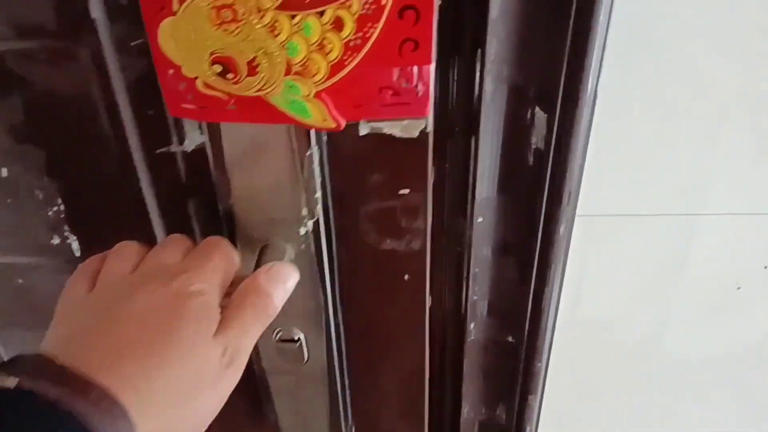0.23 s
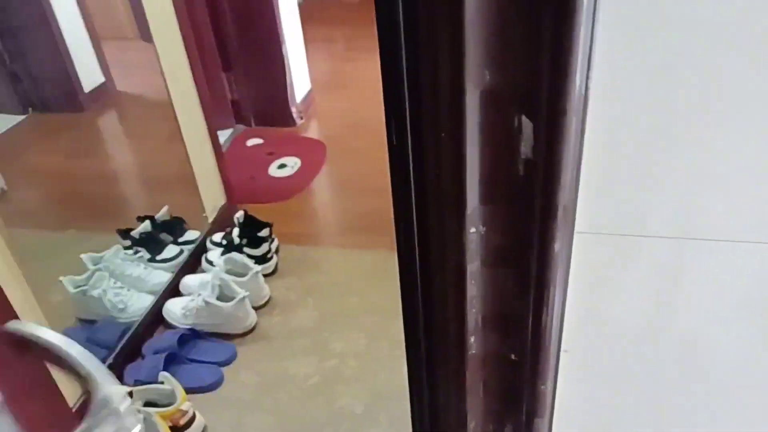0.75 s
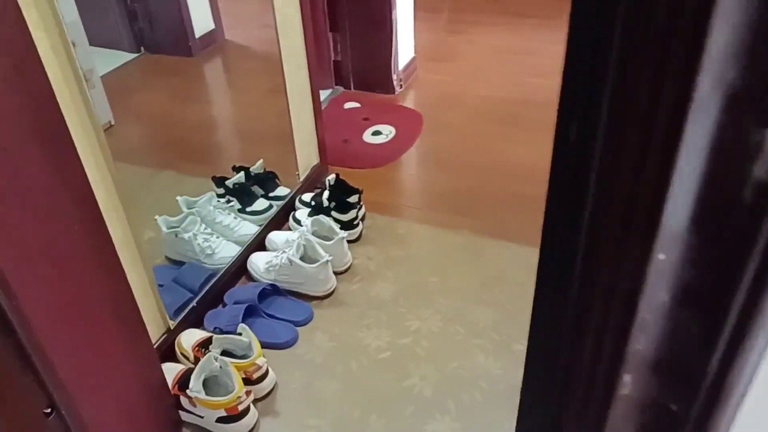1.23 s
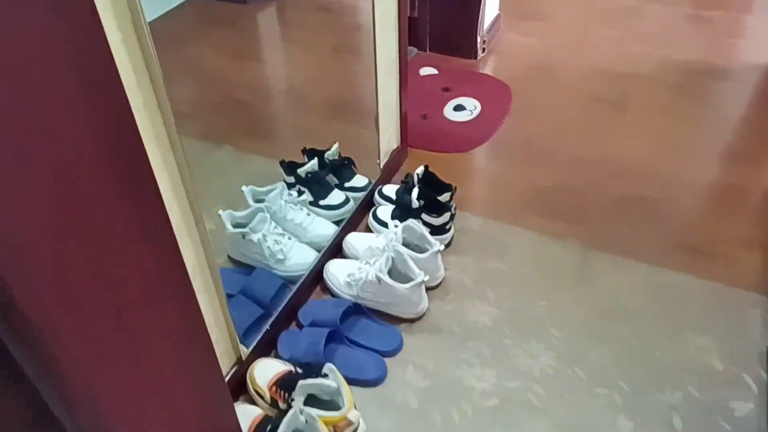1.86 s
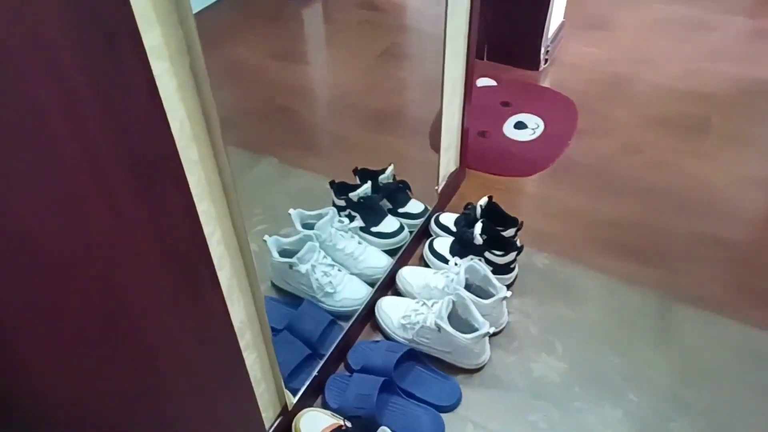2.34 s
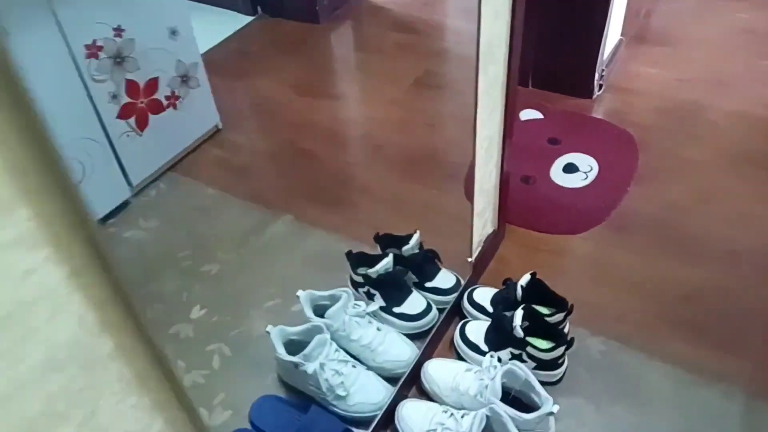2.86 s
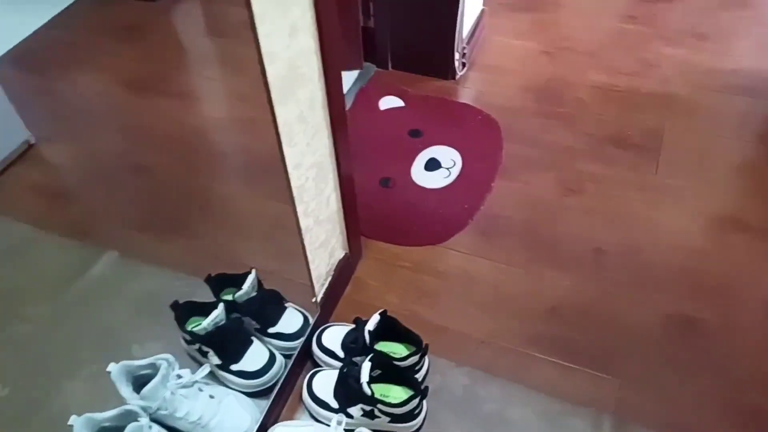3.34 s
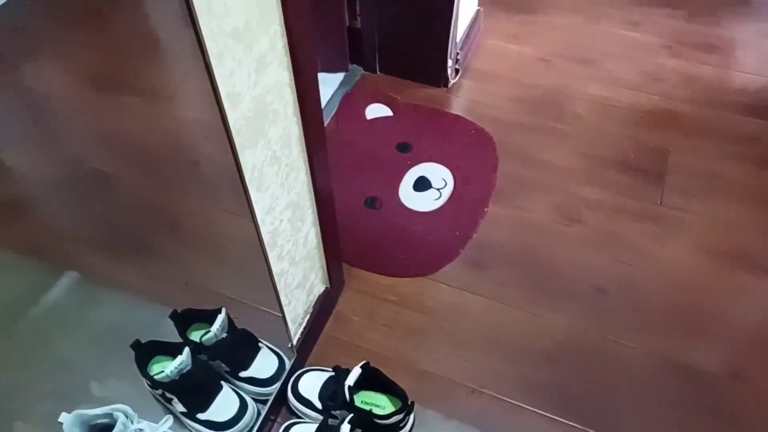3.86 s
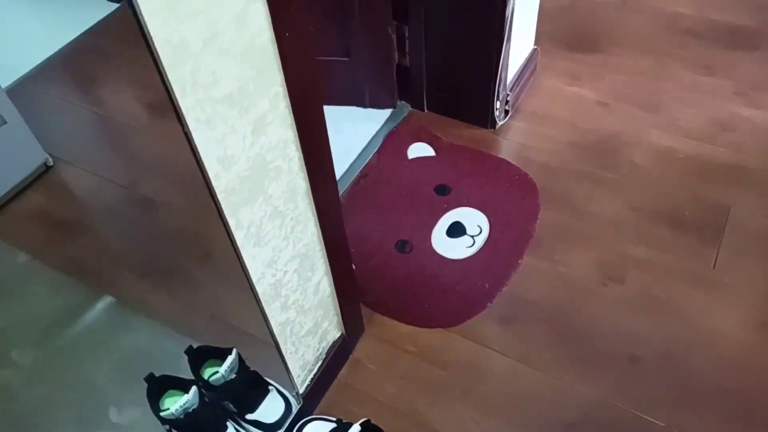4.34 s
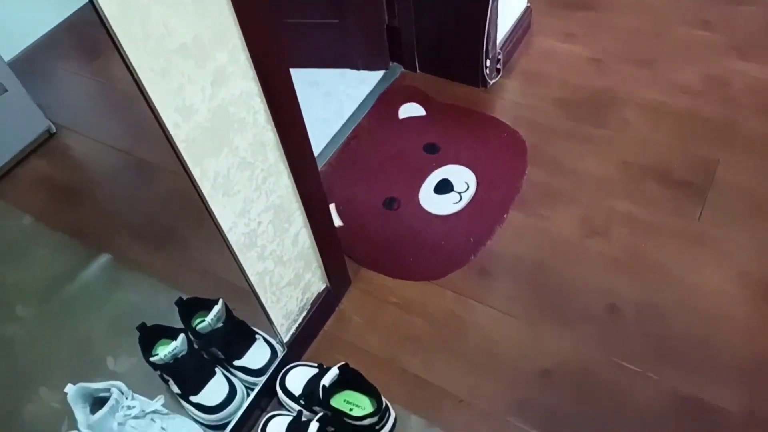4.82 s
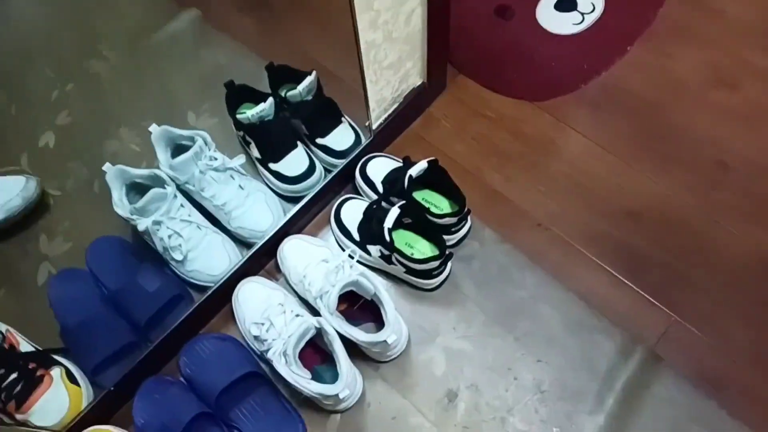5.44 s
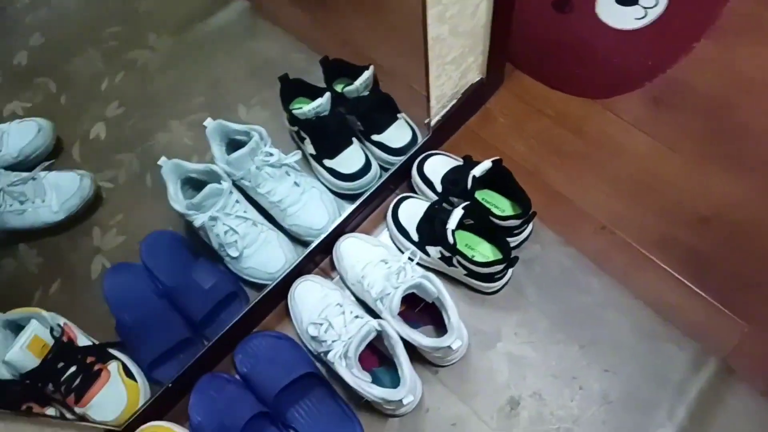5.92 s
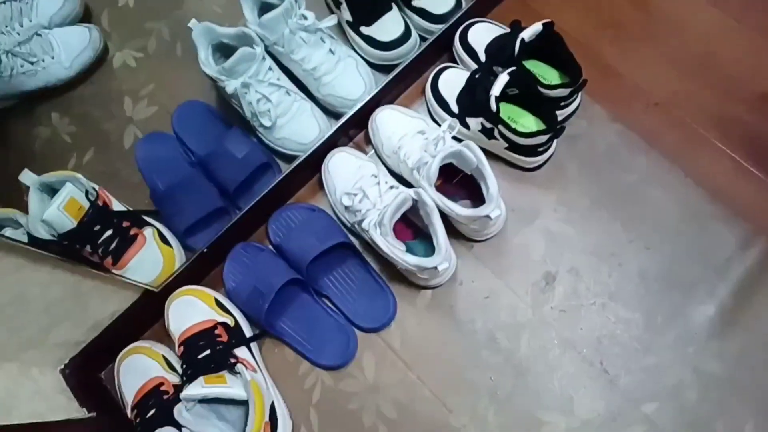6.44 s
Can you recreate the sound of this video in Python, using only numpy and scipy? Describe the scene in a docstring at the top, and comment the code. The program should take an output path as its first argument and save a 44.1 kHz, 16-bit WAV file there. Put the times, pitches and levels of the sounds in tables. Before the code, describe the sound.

A steel front door is heard close up in a hard entrance hall, over wavering airy microphone hiss and faint low murmur. At about 0.1 s the handle gives a small crisp latch click with a little rubbing, then a soft dull knock of the leaf at 0.3 s and a tiny tick at 0.4. Quiet, low footfalls thump from about 1.1 to 1.8 s. Muffled bumps come at 2.5-2.9 s, with a bright double click at 2.94 and a hard, sharp clack at 3.26. Light knocks follow at 3.6 and 3.8. At 4.03 s the door slams: a very loud, deep double thud, the second blow 0.05 s later with bright metallic crash, short boom and echo. Loose lock metal rattles at 4.4 s and ticks at 4.7. Afterwards hiss, very faint foot shifts from 5.1, a slight scrape and click near 6.2, and a soft bump at 6.64.

```python
"""A steel front door is unlatched, swung open and, after a few steps indoors, pulled shut with a double thud.
Leaf and latch case ring with their own modes at each blow; rubbing parts and a loose lock part
are driven by clumps of random contacts; feet set the floor thumping on decaying sines.
A hard entrance hall answers with dying noise tails and booms after the slam.
Behind it lie the wavering hiss of two small microphones and the low murmur and rumble of the hall."""
import sys
import numpy as np
from scipy import signal
from scipy.fft import rfft, irfft, next_fast_len
from scipy.io import wavfile
from scipy.ndimage import uniform_filter1d

SR = 44100
rng = np.random.default_rng(int(sys.argv[2]) if len(sys.argv) > 2 else 0)


def wrap_up_sound(samples):
    """Save the sound to the file named by the first command line argument, as 16-bit audio."""
    columns = np.atleast_2d(samples).T
    # keep every value between -1 and 1, then stretch to whole-number steps
    tamed = np.clip(columns, -1, 1)
    steps = np.round(tamed * 32767).astype(np.int16)
    wavfile.write(sys.argv[1], SR, steps)


def linear_from_db(decibels):
    """Turn decibels (scalar or array-like) into linear amplitude factors; 0 gives 1."""
    return 10 ** (np.asarray(decibels, float) / 20)


N = 294588   # length in samples

# All levels are relative: each layer's own trim and the stereo balance come on top.
# Blows on the door leaf: start_s, level_db, middle_hz and width_octaves of the excited range,
# freedom to ring (share of the full t60, 0-1)
LEAF_BLOWS = [(0.079, -41, 263, 0.38, 0.7), (.307, -26, 232, 0.79, 0.54), (2.475, -29, 277, 0.29, 0.14),
              (2.580, -40, 560, 0.83, 0.47), (2.602, -34, 346, 0.76, 0.13), (2.658, -16.5, 310, 0.99, 0.06),
              (2.679, -31.5, 252, 0.67, 0.35), (2.701, -34, 297, 1, 0.11), (2.755, -36.5, 400, 1.6, 0.37),
              (2.829, -34, 303, 0.6, .2), (2.857, -40, 119, 0.63, 0.7), (2.916, -32, 48.2, 0.23, 1),
              (2.926, -24, 170, 0.85, 0.28), (2.940, -24.5, 450, 0.25, 0.96),
              (3.259, -26.5, 293, 1.1, 0.58), (3.638, -26.5, 314, 0.89, 0.44), (3.843, -45, 219, 2, 0.44),
              (4.031, 1.5, 176, 0.45, 0.39), (4.083, -2.5, 71, 0.81, 0.46), (4.086, -6, 169, 1.19, 0.49),
              (4.103, -14, 278, 0.78, 0.7), (4.117, -10, 200, 1, 0.39), (4.190, -20, 200, 0.65, 0.97),
              (4.24, -22.5, 155, .3, 0.99), (6.637, -34, 110, 0.77, 0.5), (6.643, -30, 370, 0.76, 0.25)]
# Main modes of door leaf and frame: pitch_hz, level_db, t60_s when fully free
LEAF_MODES = [(43.6, -2.5, 1.05), (48.9, -12.5, 2.7), (73.7, -4, 0.96), (97, -2, 0.21), (121.3, -2, 0.17),
              (157.4, -8.5, 1.89), (162, -7.5, 0.61), (183.4, -14, 0.56), (222.1, -3, 0.59),
              (268, -17, 0.16), (308, -7, 0.75), (324, -6.5, 0.24), (395, -4.5, 0.52), (476, 0.5, 0.18),
              (535, -14.5, 0.77), (686, -1.5, 0.25)]
# Latch clicks: start_s, level_db, middle_hz and width_octaves of the excited range
LATCH_CLICKS = [(0.032, -31, 1300, .5), (0.086, -33, 1300, 0.5), (0.096, -8.5, 1440, 0.26),
                (0.105, -34, 1300, 0.45), (0.108, -40, 1300, .6), (0.397, -30, 2840, 0.37),
                (2.911, -30, 1250, 0.55), (2.9429, -13, 2580, 0.74), (2.946, -11.5, 2350, 0.29),
                (3.2587, -1, 1660, 1.6), (3.543, -31.5, 4060, 1.6), (3.845, -26.5, 1240, 1.25),
                (4.032, -15, 4500, 2), (4.035, -26, 2400, 2.1), (4.084, -1, 5500, 1.2),
                (4.087, -2.5, 2400, 0.97), (4.108, -9, 6300, .7), (4.121, -6.5, 2500, 1),
                (4.192, -11, 1800, 1.5), (4.414, -19, 3460, 0.97), (4.695, -24, 4500, 0.73),
                (6.185, -31, 2300, 1)]
# Modes of the latch case: pitch_hz, level_db, t60_s
LATCH_MODES = [(620, -16, .012), (800, -12, .012), (965, 0, .018), (1120, -4, .012), (1290, -3, .014),
               (1550, -9, .01), (1940, -8, .008), (2250, -5, .009), (2700, -10, .006), (3400, -9, .006),
               (4500, -4, .006), (6000, -6, .005), (7100, -8, .004), (11000, -7, .003)]
# Bouts of rubbing and chattering parts: start_s, t60_s, scrape_db, grit_db, ticks_db
CHATTER_BOUTS = [(0.03, .3, -50, -56, -75), (0.065, 0.27, -41, -38, -49.5), (0.13, 0.67, -50, -51.5, -80),
                 (2.905, 0.22, -34.5, -46, -44), (2.936, 0.055, -38, -37, -27.5),
                 (3.54, .12, -49, -50, -38), (4.027, 0.11, -15.5, -14, -19.5),
                 (4.082, 0.17, -20, -13.5, -17), (4.105, 0.12, -21, -30, -25),
                 (4.13, 0.35, -28, -27.5, -36), (4.182, 0.17, -37.5, -34, -40),
                 (4.413, 0.17, -42, -20, -28), (4.483, 0.18, -70, -29.5, -42), (4.68, 0.17, -53, -40, -49),
                 (6.16, 0.36, -43, -38, -41.5), (6.225, 0.063, -50, -44, -58)]
# Colour of the dull scrape: pitch_hz, density_db (per Hz)
SCRAPE_COLOUR = [(210, -33), (350, -2), (439, -0.5), (475, -2), (596, 0.5), (731, -5.5), (2000, -3.5),
                 (2600, -33), (4400, -120)]
# Colour of the bright chatter: pitch_hz, density_db (per Hz)
GRIT_COLOUR = [(1000, -32), (1700, -24), (1850, 4), (2750, 6.5), (3380, 2.5), (4500, -5.5), (5850, -54),
               (9900, -120)]
# Colour of the sharp ticks: pitch_hz, density_db (per Hz)
TICKS_COLOUR = [(2530, -25), (4300, -7), (5840, 4), (6530, 0.5), (6930, 3.5), (8450, -20), (13400, -5),
                (15500, -25)]
# Rattling of the loose lock part after the door is shut: start_s, t60_s, level_db
RATTLE_BOUTS = [(4.408, 0.21, -22.5), (4.5, 0.63, -46.5)]
# Modes of the loose lock part: pitch_hz, level_db, t60_s
LOCK_MODES = [(964, -14, .12), (1631, -12, .08), (1932, 0, .16), (2040, -3, .14), (2230, -6, .08),
              (2295, -4, .08), (2352, -2, .12), (2380, -4, .1), (2547, -2, .14), (2926, -8, .1),
              (3185, -7, .1), (3683, 0, .12), (3747, -5, .1), (3791, -3, .12), (4587, -11, .08),
              (4980, -9, .08), (5426, -12, .07), (5900, -9, .05), (6150, -9, .05), (7050, -13, .06)]
# Footfalls and shifts of weight: start_s, level_db, pitch_hz of the floor thump, t60_s
FOOTFALLS = [(0.698, -55, 320, 0.072), (0.914, -53, 337.4, 0.84), (1.059, -44.5, 122, 0.19),
             (1.254, -37, 90, 0.089), (1.363, -31, 101, 0.092), (1.43, -32, 80.7, 0.082),
             (1.457, -35, 91.5, 0.081), (1.647, -35, 92, 0.14), (1.688, -29.5, 92.6, 0.13),
             (1.727, -29, 94, 0.094), (5.079, -44, 104, 0.13), (5.159, -49, 124, 0.15),
             (5.509, -46.5, 143, 0.22), (5.609, -49.5, 116, 0.14), (5.736, -43.5, 160, 0.12),
             (5.87, -53, 102, 0.15), (5.896, -48, 310, 0.24), (5.924, -47, 194, 0.24),
             (6.215, -50, 176, 0.12), (6.234, -51.5, 525, 0.3), (6.538, -49, 360, 0.22)]
# Left-right balance of door, feet and echoes: pitch_hz, left_over_right_db
DOOR_BALANCE = [(60, 1), (130, 2.5), (290, 0.5), (640, 0.5), (1410, -5.5), (3100, -14.5), (6820, 3.5),
                (15000, 4)]
# Late decay of the hall: pitch_hz, t60_s
HALL_DECAY = [(60, 0.29), (250, 0.2), (1000, 0.62), (3000, 0.37), (8000, 0.13), (15000, .2)]
# Strength of the hall echoes: pitch_hz, level_db
HALL_STRENGTH = [(60, -20), (300, -12), (1000, 2), (4000, -10), (12000, 7)]
# Edges for the echo bands, half an octave apart: pitch_hz
BAND_EDGES = 22 * 2 ** np.arange(0, 9.6, .5)
# Booming of the hall after the slam: start_s, t60_s, murmur_db, rumble_db
HALL_BOOM = [(4.1, 0.38, -28, -23)]
# Swells of the hiss: time_s, hiss_db, top_db (top of the hiss)
HISS_SWELLS = [(0.0, -63.5, -75), (0.15, -54.5, -80), (0.3, -63.5, -75), (0.61, -56.5, -64.5),
               (0.8, -53.5, -56.5), (1.08, -50.5, -53.5), (1.7, -51.5, -51), (2.31, -48, -49.5),
               (2.7, -50.5, -48), (3.0, -45, -45), (3.27, -47.5, -46), (3.7, -42.5, -45.5), (4.1, -47, -46),
               (4.28, -49, -47.5), (4.45, -43.5, -53), (4.7, -46, -48.5), (5.3, -46, -51),
               (6.0, -47.5, -51), (6.68, -47, -52.5)]
# Colour of the main hiss: pitch_hz, density_db (per Hz)
HISS_COLOUR = [(530, -43), (900, -24), (1050, -25), (1280, -11.5), (1450, -11.5), (2340, -3.5), (3090, -5),
               (5000, -4.5), (6500, -16), (11000, -120)]
# Colour of the top of the hiss: pitch_hz, density_db (per Hz)
HISS_TOP_COLOUR = [(2650, -17.5), (4500, -6.5), (6850, -2), (8320, -17), (12000, -16.5), (13900, -19.5),
                   (14800, -13.5), (15400, -33), (15800, -62.5)]
# Level of the low hall background: time_s, murmur_db, rumble_db
HALL_SWELLS = [(0.0, -53, -58), (0.15, -44.5, -45.5), (0.26, -58, -59), (0.36, -52.5, -40),
               (0.7, -64.5, -63.5), (0.93, -56, -54), (1.4, -59.5, -59.5), (1.6, -56.5, -56),
               (2.3, -58, -64.5), (2.9, -54.5, -49), (3.25, -57, -56), (3.42, -46, -55), (3.55, -59.5, -70),
               (4.0, -54.5, -52), (4.65, -58.5, -52), (4.91, -75, -62), (5.3, -81, -58), (5.54, -51, -83),
               (5.71, -71.5, -64), (5.86, -56, -64.5), (6.1, -67, -74), (6.53, -49, -64), (6.68, -56, -72)]
# Colour of the hall murmur: pitch_hz, density_db (per Hz)
MURMUR_COLOUR = [(120, -40), (200, -1), (506, 0.5), (745, -4.5), (1060, -4.5), (1280, -2.5), (1800, -8.5),
                 (2340, -4), (3960, -120)]
# Colour of the hall rumble: pitch_hz, density_db (per Hz)
RUMBLE_COLOUR = [(13, -40), (22, -15.5), (129, 2), (262, -10.5), (320, -9.5), (420, -10), (700, -120)]
# Likeness of the two channels in the steady sound: pitch_hz, correlation (-1 to 1)
STEREO_LIKENESS = [(60, 0.75), (150, 0.7), (380, 0.82), (950, 0.02), (2380, 0.0003), (5980, -0.035),
                   (15000, 0.025)]
# Left-right balance of the steady sound: pitch_hz, left_over_right_db
BACKGROUND_BALANCE = [(60, -1), (130, 0), (290, -0.5), (640, 0.5), (1410, -4.5), (3100, -9.5), (6820, 5),
                      (15000, 5)]

LEAF_CONTACT_MS, PANEL_CONTACT_MS, LATCH_CONTACT_MS = 1.3, 1.6, 0.34   # time constants of a blow's onset
PANEL_WIDENING = 1.53   # a blow excites the panel over a range this many times wider
RISE_SHARE = 0.12   # a bout swells for this share of its t60
EARLY_DB, EARLY_T60_S = 14, 0.037   # first echoes from the near walls, over the late tail


def leaf():
    """The main modes ring long; many small panel modes die fast and make the crash."""
    pitches = np.geomspace(90, 1400, num=40) * rng.uniform(0.94, 1.03, size=40)
    panel_modes = [(hz, -3.0 * np.log2(hz / 300), 0.31 * (300 / hz) ** 0.26) for hz in pitches]
    wider_blows = [(s, db, hz, PANEL_WIDENING * width, free) for s, db, hz, width, free in LEAF_BLOWS]
    main = struck(LEAF_BLOWS, LEAF_MODES, gain_db=-5.0, scatter_db=4.0, seconds=0.83,
                  contact_ms=LEAF_CONTACT_MS)
    crash = struck(wider_blows, panel_modes, gain_db=-14.0, scatter_db=4.0, seconds=0.25,
                   contact_ms=PANEL_CONTACT_MS)
    return main + crash


def latch():
    """Short hard clicks ring the fast-dying modes of the latch case."""
    free_clicks = [(*click, 1) for click in LATCH_CLICKS]
    return struck(free_clicks, LATCH_MODES, gain_db=-2.0, scatter_db=3, seconds=0.03,
                  contact_ms=LATCH_CONTACT_MS)


def struck(events, modes, gain_db, scatter_db, seconds, contact_ms):
    """Each blow rings the modes near its own range; neighbouring modes start in opposite directions."""
    hz, mode_db, t60 = np.transpose(modes)[:, :, None]
    t = np.arange(int(seconds * SR)) / SR
    out = np.zeros(N + len(t))
    direction = (-1.0) ** np.arange(len(modes))[:, None]
    sines = np.sin(2 * np.pi * hz * t) * direction
    scatter = scatter_db * rng.standard_normal((len(events), len(modes), 1))
    onset = 1 - np.exp(-1000 * t / contact_ms)
    for (s, db, middle, width, free), chance in zip(events, scatter):
        octaves_off = np.log2(hz / middle)
        range_db = -6 * (octaves_off / max(width, 0.3)) ** 2
        start_db = db + gain_db + mode_db + chance + range_db
        rings = np.sum(linear_from_db(start_db - 60 * t / (t60 * free)) * sines, axis=0)
        start = int(s * SR)
        out[start:start + len(t)] += rings * onset
    return out[:N]


def chatter():
    """Uneven contacts come in clumps and sound in three colours; the two bright ones share their contacts."""
    scrape_gain, grit_gain, ticks_gain = bouts(CHATTER_BOUTS)
    clumps = linear_from_db(2.2 * drift(57))
    rubbing = clumps * grains(900, spread_db=1.5)
    contacts = clumps * grains(2000, spread_db=0.0)
    scrape = rms_one(coloured(rubbing, SCRAPE_COLOUR))
    grit = rms_one(coloured(contacts, GRIT_COLOUR))
    ticks = rms_one(coloured(contacts, TICKS_COLOUR))
    return linear_from_db(-2.0) * scrape_gain * scrape + linear_from_db(-3.5) * grit_gain * grit + linear_from_db(-4.0) * ticks_gain * ticks


def rattle():
    """Quick touches keep the modes of the loose lock part ringing."""
    touches = bouts(RATTLE_BOUTS)[0] * grains(500, spread_db=3.0)
    return linear_from_db(-30.5) * sum(linear_from_db(db) * ring(touches, hz, t60) for hz, db, t60 in LOCK_MODES)


def ring(clicks, hz, t60):
    """A two-pole resonator: a unit click sets a dying sine of height about 1 ringing."""
    r = linear_from_db(-60 / (t60 * SR))
    w = 2 * np.pi * hz / SR
    return signal.lfilter([0, np.sin(w)], [1, -2 * r * np.cos(w), r * r], clicks)


def steps():
    """A soft push sets the floor thumping on one pitch and a few weaker ones around it."""
    out = np.zeros(N)
    spread = rng.uniform(-0.987, 1, (len(FOOTFALLS), 5))
    for (s, db, hz, t60), off in zip(FOOTFALLS, spread):
        start = int(s * SR)
        t = np.arange(min(SR // 2, N - start)) / SR
        swell = 1 - np.exp(-t * hz * 1.9)
        off = off[:, None]
        others = np.sin(2 * np.pi * hz * 2 ** (0.6 * off) * t + 9 * off).sum(axis=0)
        # higher-pitched, lighter touches are less pure
        tone = np.sin(2 * np.pi * hz * t) + others * min(hz / 500, 1)
        out[start:start + len(t)] += linear_from_db(db + 0.5 - 60 * t / t60) * swell * tone
    return out


def hall(x):
    """Echo tail of each ear: noise that dies octave by octave, with a fast-dying early part."""
    t, tail = np.arange(SR) / SR, 0
    for low, high in zip(BAND_EDGES[::2], BAND_EDGES[2::2]):
        hz = np.sqrt(low * high)
        band_filter = signal.butter(2, [low, high], "band", fs=SR, output="sos")
        band = signal.sosfilt(band_filter, rng.standard_normal((2, SR)))
        late = linear_from_db(-60 * t / at_hz(HALL_DECAY, hz))
        early = linear_from_db(EARLY_DB - 60 * t / EARLY_T60_S)
        dying = (late + early) * np.minimum(t / 0.0009, 1)
        tail = tail + linear_from_db(at_hz(HALL_STRENGTH, hz)) * band * dying / np.sqrt(np.sum(dying ** 2))
    return signal.fftconvolve(x[None], tail, axes=1)[:, :N]


def hiss():
    """Microphone hiss: two bands of steady noise that swell and waver separately."""
    hiss_db, top_db = in_time(HISS_SWELLS)
    main = linear_from_db(hiss_db) * steady(HISS_COLOUR, flicker_db=0.35)
    return main + linear_from_db(top_db) * steady(HISS_TOP_COLOUR, flicker_db=0.4)


def hall_noise():
    """Low murmur and rumble of the hall as flickering noise, booming up after the slam."""
    murmur, rumble = linear_from_db(np.array(in_time(HALL_SWELLS))) + bouts(HALL_BOOM)
    low = rumble * steady(RUMBLE_COLOUR, flicker_db=2.5)
    return murmur * steady(MURMUR_COLOUR, flicker_db=3.5) + low


def steady(spectrum, flicker_db):
    """Coloured stereo noise, alike in the bass; mid rms is 1 before the level flickers."""
    mid, side = coloured(rng.standard_normal((2, N)), spectrum)
    mid = coloured(mid, [(hz, 10 * np.log10(1 + c)) for hz, c in STEREO_LIKENESS])
    side = coloured(side, [(hz, 10 * np.log10(1 - c)) for hz, c in STEREO_LIKENESS])
    flicker = linear_from_db(flicker_db * drift(13.7))
    return flicker * np.array([mid + side, mid - side]) / np.std(mid)


def grains(per_s, spread_db):
    """Random contacts of uneven size and either sign; rms 1."""
    sizes = linear_from_db(spread_db * np.minimum(rng.exponential(1, N), 4)) * rng.choice([-1, 1], N)
    return rms_one(sizes * (rng.random(N) < per_s / SR))


def bouts(rows):
    """Each row swells quickly, then dies away; one gain in time for each dB column."""
    out = 0
    for s, t60, *dbs in rows:
        t = np.arange(N) / SR - s
        rise = RISE_SHARE * t60
        shape = np.clip(t / rise, 0, 1) * linear_from_db(-60 * np.clip(t - rise, 0, 3 * t60) / t60)
        out = out + linear_from_db(np.array(dbs))[:, None] * shape
    return out


def drift(rate_hz):
    """Slow random wandering of rms 1: noise through two equal low-pass poles, run at SR / 40."""
    r = np.exp(-2 * np.pi * rate_hz * 40 / SR)
    slow = signal.lfilter([1], [1, -2 * r, r * r], rng.standard_normal(N // 40 + 2002))
    slow = slow[2000:]   # the filter has settled
    return np.interp(np.arange(N) / 40, np.arange(len(slow)), rms_one(slow))


def coloured(x, spectrum):
    """Shape the last axis of x by (pitch_hz, level_db) points."""
    size = next_fast_len(x.shape[-1])
    hz = np.maximum(np.fft.rfftfreq(size, 1 / SR), 1)
    return irfft(rfft(x, size) * linear_from_db(at_hz(spectrum, hz)), size)[..., :x.shape[-1]]


def at_hz(points, hz):
    """Read a curve on a log-frequency axis."""
    pitch_hz, value = np.transpose(points)
    return np.interp(np.log(hz), np.log(pitch_hz), value)


def in_time(rows):
    """Columns of a time curve at every sample."""
    s, *columns = np.transpose(rows)
    return [np.interp(np.arange(N) / SR, s, c) for c in columns]


def rms_one(x):
    """Scale to rms 1."""
    return x / np.sqrt(np.mean(x ** 2) + 1e-20)


def sided(x, balance):
    """Half the left-right difference goes to each channel."""
    return np.array([coloured(c, [(hz, sign * db / 2) for hz, db in balance])
                     for c, sign in zip(x, (1, -1))])


def gain_control(x, threshold_db, share, ahead_s, release_db_per_s):
    """Turns down by a share of the overshoot just before loud peaks and recovers at a steady rate."""
    over = np.maximum(20 * np.log10(np.abs(x).max(axis=0) + 1e-9) - threshold_db, 0)
    ramp = release_db_per_s * np.arange(N) / SR   # release before the share is taken
    held = np.maximum.accumulate(over + ramp) - ramp
    ahead = int(ahead_s * SR)
    early = np.maximum(held, np.append(held[ahead:], np.zeros(ahead)))
    return x * linear_from_db(-share * uniform_filter1d(early, size=101))


def scene():
    """Door and feet in the hall, over the steady sound."""
    near = leaf() + latch() + chatter() + rattle() + steps()
    direct = np.array([near, np.roll(near, 9)])   # sound reaches the left microphone 9 samples first
    door = sided(direct + hall(near), DOOR_BALANCE)
    return door + sided(hiss() + hall_noise(), BACKGROUND_BALANCE)


def top_cut(x):
    """Nothing passes above the cut-off."""
    return signal.sosfilt(signal.butter(12, 16620, fs=SR, output="sos"), x)


def record(dry):
    """The microphones drop the deepest bass, gain control tames the blows and peaks are softly rounded."""
    bass_cut = signal.butter(4, 33, "high", fs=SR, output="sos")
    cut = signal.sosfilt(bass_cut, dry)
    tamed = gain_control(cut, threshold_db=-15.5, share=0.17, ahead_s=0.013, release_db_per_s=255)
    mix = 1.055 * np.tanh(tamed / 1.135)
    return top_cut(mix)


dry = scene()
out = record(dry)
wrap_up_sound(out)
```